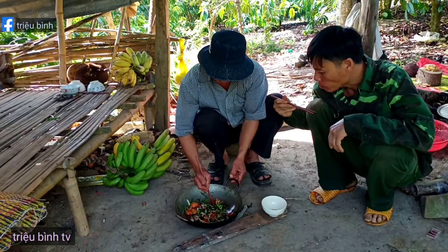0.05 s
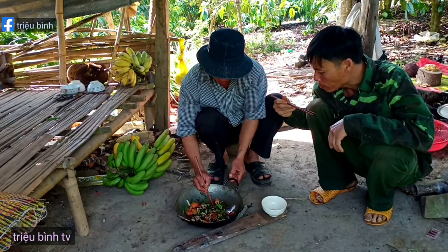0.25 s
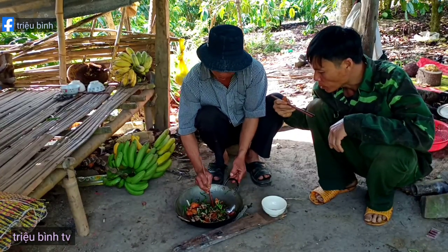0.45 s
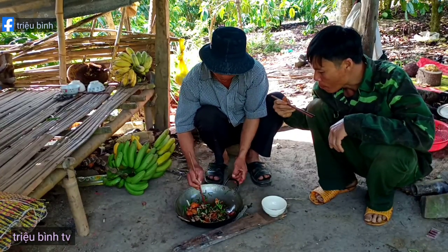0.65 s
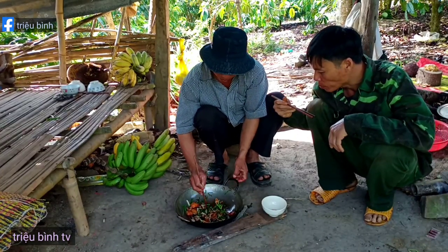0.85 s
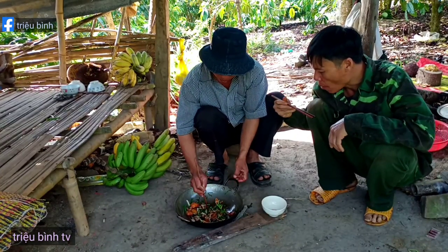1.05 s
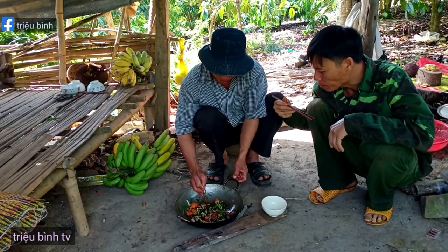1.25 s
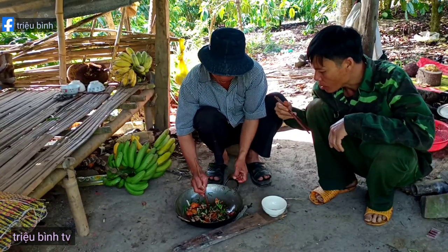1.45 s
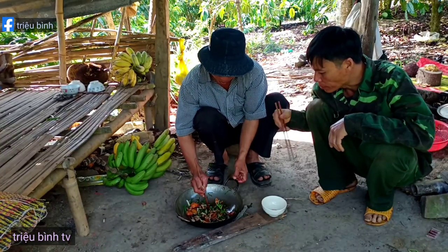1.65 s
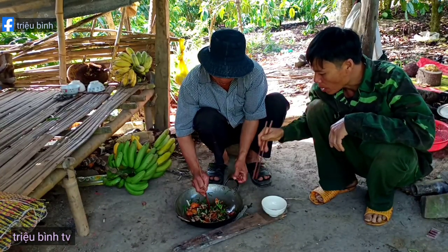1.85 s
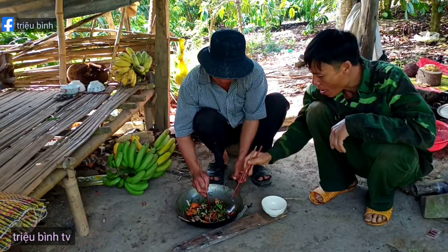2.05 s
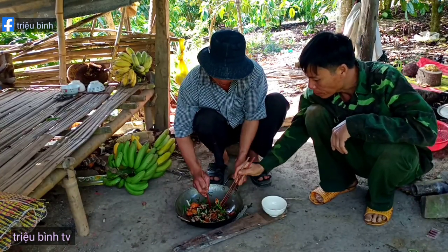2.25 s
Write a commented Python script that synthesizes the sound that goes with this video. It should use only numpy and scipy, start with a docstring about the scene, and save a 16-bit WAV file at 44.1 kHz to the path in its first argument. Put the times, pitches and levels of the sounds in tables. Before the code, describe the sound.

Hard shells rattle and clack in a metal wok, then sparse ticks and soft hollow knocks

```python
"""A quick rattle of shells builds to sharp clacks, then sparse ticks and hollow knocks follow over hum and air.
Chopsticks stir hard shells in a metal wok: each contact excites resonances of shell, heap, treble and wok body.
Noise grains make the sliding scrape; short decaying sines make the hollow knocks.
Air, engine hum and crackle are loud during the rattle, then drop and swell briefly around small sounds.
A camera microphone adds faint hiss, dips the low treble and cuts the top."""
import sys
import numpy as np
from scipy import signal
from scipy.fft import rfft, irfft
from scipy.io import wavfile
from scipy.ndimage import uniform_filter1d

SR = 44100
rng = np.random.default_rng(int(sys.argv[2]) if len(sys.argv) > 2 else 0)


def transcribe(u):
    """Save the signal u as a 16-bit wav file named by the first command-line argument.

    u: samples, shape (n,) or (channels, n), limited to [-1, 1]; the rate is SR.
    q: integer samples, one column per channel.
    """
    v = np.clip(np.atleast_2d(u).T, -1, 1)
    q = np.round(v * 32767).astype(np.int16)
    wavfile.write(sys.argv[1], SR, q)


N = 101429


def amp(db):
    """Decibels to linear gain."""
    return 10 ** (np.asarray(db) / 20)


def band(x, hz, width_hz):
    """Two-pole resonance, gain 1 at the centre."""
    return signal.lfilter(*signal.iirpeak(hz, hz / width_hz, fs=SR), x)


def bandpass(x, low_hz, high_hz, order=3):
    """Flat-topped band between two edges."""
    return signal.sosfilt(signal.butter(order, [low_hz, high_hz], "band", fs=SR, output="sos"), x)


def highpass(x, hz):
    """Second-order removal of everything low."""
    return signal.sosfilt(signal.butter(2, hz, "high", fs=SR, output="sos"), x)


def add(out, at_s, x):
    """Mix x in from time at_s."""
    i = int(at_s * SR)
    out[i:i + len(x)] += x[:len(out) - i]


def fade(t, t60):
    """Exponential decay, 60 dB down after t60 seconds."""
    return np.exp(-np.log(1000) * t / t60)


def peak(x, db):
    """Scale x so its highest peak sits at db."""
    return x * amp(db) / np.max(np.abs(x))


def walk(rate):
    """Slow random drift of spread 1: noise averaged twice over 1/rate seconds."""
    window = int(SR / rate)
    x = uniform_filter1d(uniform_filter1d(rng.standard_normal(N), window), window)
    return x / np.std(x)


def hum():
    """Three harmonics of a distant engine, unsteady in pitch and each in level."""
    # Each row: rms level in dB of one harmonic, lowest first, before the background level is applied
    harmonic_db = [-73, -74, -77]
    hum_hz, waver, flutter_db = 43.8, 0.052, 1.5  # waver is the pitch spread as a share
    phase = 2 * np.pi * np.cumsum(hum_hz * (1 + waver * walk(8))) / SR
    out = np.zeros(N)
    for k, db in enumerate(harmonic_db):
        level = np.sqrt(2) * amp(db + flutter_db * walk(2.1))
        out += level * np.sin((k + 1) * phase + 2 * np.pi * rng.random())
    return out


def crackle():
    """Tiny scattered treble ticks, each with a short noise tail."""
    per_s, gain_db, spread_db, centre_hz = 99, -76, 3, 8300
    ticks_at = rng.random(N) < per_s / SR
    impulses = ticks_at * amp(spread_db * rng.exponential(size=N))
    t = np.arange(SR // 20) / SR
    tail = rng.standard_normal(len(t)) * fade(t, 0.1)
    x = signal.fftconvolve(impulses, tail)[:N]
    return amp(gain_db) * band(band(x, centre_hz, 1500), centre_hz, 2300)


def air():
    """Outdoor air: noise shaped in frequency, split at 4500 Hz into a low and a high part."""
    # Spectrum of the air. Each row: frequency in Hz, relative level in dB per Hz
    spectrum = np.array([(20, -31.5), (40, -11), (110, -3.5), (190, -10), (250, -8), (476, -9.5),
                         (1330, -14), (3600, -19.5), (4300, -24), (5000, -27), (7000, -29.5), (8500, -26),
                         (9800, -31), (15500, -39)])
    air_rms_db = -66.5  # before the background level is applied
    f = np.maximum(np.fft.rfftfreq(N, 1 / SR), 1)
    shape_db = np.interp(np.log(f), np.log(spectrum[:, 0]), spectrum[:, 1])
    noise = rfft(rng.standard_normal(N)) * amp(shape_db)
    noise *= amp(air_rms_db) / np.std(irfft(noise, N))
    return irfft(noise * (f < 4500), N), irfft(noise * (f >= 4500), N)


def background():
    """Air, hum and crackle rise and fall together; in the brief swells the treble has its own height."""
    # Level curve laid over the bed. Each row: time in seconds, gain in dB
    level_curve = [(0, 11), (.03, 23), (.08, 19.5), (.2, 26.5), (.24, 25.5), (.28, 22.5), (.343, 27),
                   (.355, 20), (.45, 10.5), (.66, 10.5), (.685, -4), (.85, -2.5), (1.4, -0.5), (2.3, 2)]
    # Brief swells. Each row: start of hold in seconds, held time in seconds, height in dB, treble height in dB
    swells = [(0.865, 0.048, 15, 15.5), (1.058, 0.049, 8, 13.5), (1.317, 0.053, 15.5, 16),
              (1.498, 0.061, 10, 15), (1.636, 0.011, 6, 2.5), (1.782, 0.04, 14, 13.5),
              (2.277, 0.031, 9, 6.5)]
    rise_s, fall_s, sag = 0.014, 0.02, 0.11  # sag: share of a swell lost while it is held
    hum_share = 0.85  # share of the gain in dB that the hum follows
    t = np.arange(N) / SR
    low, high = air()
    high = high * amp(1.4 * walk(22)) + crackle()  # the air's treble flickers
    gain_db = np.interp(t, *np.array(level_curve).T)
    high_db = gain_db
    for at, held, db, treble_db in swells:
        corners = [at - rise_s, at, at + held, at + held + fall_s]
        shape = np.interp(t, corners, [0, 1, 1 - sag, 0])
        gain_db = gain_db + db * shape
        high_db = high_db + treble_db * shape
    return low * amp(gain_db) + hum() * amp(hum_share * gain_db) + high * amp(high_db)


def scrape():
    """Shells sliding on the steel: dense fine grains in the low treble, with a thin hiss on top."""
    from_s, to_s, per_s, gain_db, hiss_db = 0.015, 0.3, 2500, -33, -10.5  # hiss gain re low treble
    t = np.arange(N) / SR
    grains = (rng.random(N) < per_s / SR) * rng.standard_normal(N)
    grains = grains * amp(2.5 * walk(90))  # uneven pressure
    grains *= np.interp(t, [from_s, from_s + .01, to_s, to_s + .06], [0, 1, 1, 0])
    mid = bandpass(grains, 2000, 4300)
    top = bandpass(grains, 7500, 15000, order=1)
    return amp(gain_db) * (mid + amp(hiss_db) * top)


def knocks():
    """A few cycles of a hollow low note and its upper mode, with a scuff of noise behind."""
    # Hollow knocks. Each row: start in seconds, note peak in dB, pitch in Hz, decay t60 in seconds,
    # scuff in dB re note, upper mode in dB re the pitch
    knock_table = [(.159, -40, 403, 0.022, -22, -9), (.234, -25, 408, 0.04, -30.5, -9),
                   (0.865, -38, 375, 0.09, -7, -2.5), (1.317, -45.5, 429, 0.086, -17, -17),
                   (1.326, -42, 358.5, 0.081, 3.5, -10), (1.534, -42.5, 95, 0.074, -30, -7),
                   (1.7816, -37, 401.5, 0.039, -3.5, -6), (2.283, -29, 428, 0.03, -13.5, -19)]
    upper_ratio, rise_s = 1.5, 0.0016
    scuff_t60_s, scuff_cut_s, scuff_release_s = 0.3, 0.041, 0.02
    out, t = np.zeros(N), np.arange(SR // 6) / SR
    for at, db, hz, t60, scuff_db, upper_db in knock_table:
        note = np.sin(2 * np.pi * hz * t) + amp(upper_db) * np.sin(2 * np.pi * upper_ratio * hz * t)
        note *= (1 - np.exp(-t / rise_s)) ** 2 * fade(t, t60)
        scuff = bandpass(rng.standard_normal(len(t)) ** 3, 700, 3800)  # cubing makes it spiky
        scuff *= fade(t, scuff_t60_s)
        scuff *= np.interp(t, [scuff_cut_s, scuff_cut_s + scuff_release_s], [1, 0])
        add(out, at, peak(note, db) + peak(scuff, db + scuff_db))
    return out


def contact(t, t60, tail_rms):
    """Raw excitation: a unit tick, four quick bounces that weaken with delay, and a fading noise tail."""
    bounce_s, bounce_db = 0.004, -3.5  # span of the bounces, level change across it
    noise, when = rng.standard_normal(len(t)), rng.random(4)
    hit = tail_rms * noise * fade(t, t60)
    hit[0] += 1
    bounce_at = (when * bounce_s * SR).astype(int) + 8
    hit[bounce_at] += amp(bounce_db * when) * np.sign(noise[:4])
    return hit


def ring(hit, hz, q):
    """Shell ring: two resonances in series, the second half as sharp, peak at 0 dB; Q is at least 0.7."""
    width_hz = hz / max(q, .7)
    return peak(band(band(hit, hz, width_hz), hz, 2 * width_hz), 0)


def treble(hit, db, hz):
    """A bright 2000 Hz wide band, a flat fizz above it and a weak broad layer."""
    bright = bandpass(hit, hz - 1000, hz + 1000)
    fizz = highpass(hit, 10200) * fade(np.arange(len(hit)) / SR, 0.57)
    wide = band(hit, 6000, 7000)
    return peak(bright, db) + peak(fizz, db - 3) + peak(wide, db - 20)


def modes(table, t):
    """Sum of decaying sines, one for each way the body vibrates."""
    return sum(amp(db) * np.sin(2 * np.pi * hz * t) * fade(t, t60) for hz, db, t60 in table)


def ticks():
    """Light contacts: softer start, more tail, no wok body."""
    # Faint ticks and clinks. Each row: start in seconds, peak in dB, ring in Hz, bright band in dB re ring,
    # ring sharpness Q, tail t60 in seconds
    tick_table = [(0.4892, -41.5, 2180, -2, 0.98, 0.068), (0.539, -46, 2570, -15, 6, 0.1),
                  (0.5548, -39.5, 2500, -12, 2.9, 0.047), (.604, -49.5, 3040, 2, 1.5, 0.06),
                  (.611, -39, 3200, 2, 0.65, 0.065), (0.6399, -46, 1400, -6, 1.3, 0.067),
                  (1.056, -51, 2360, 7, 2.35, .1), (1.069, -41, 3520, -6.5, 1.83, 0.11),
                  (1.239, -56.5, 3230, -12.5, 8.8, 0.07), (1.4534, -57, 2982, 3, 2.3, 0.066),
                  (1.467, -50.5, 3020, 8.5, 0.63, 0.12), (1.493, -50, 3776, 12.5, 3.1, .1),
                  (1.5104, -29.5, 3150, 9.5, 1.05, 0.066), (1.5168, -38, 2610, -1, 0.5, 0.096),
                  (1.6392, -52, 2484, 4, 3.07, 0.086), (1.683, -59, 3070, 13, 1.57, 0.065),
                  (2, -49, 2450, -32.5, 2.7, 0.063), (2.0483, -55.5, 3260, -8, 7.5, 0.069),
                  (2.282, -40.5, 3710, 6, 1.4, 0.069)]
    treble_hz, rise_s = 8036, 0.00046
    out, t = np.zeros(N), np.arange(SR // 8) / SR
    for at, db, hz, treble_db, q, t60 in tick_table:
        hit = contact(t, t60, 0.42 * amp(-2))
        hit *= 1.5 - np.exp(-t / rise_s)  # gain climbs from 0.5 to 1.5
        add(out, at, peak(ring(hit, hz, q) + treble(hit, treble_db, treble_hz), db))
    return out


def clacks():
    """Each contact rings the struck shell, the heap, the treble and the wok body."""
    # Shell and chopstick clacks. Each row: start in seconds, peak in dB, shell ring in Hz,
    # bright band in dB re ring, its centre in Hz, wok body in dB re ring, tail t60 in seconds
    clack_table = [(0.0216, -26, 2530, -1, 8300, -24, 0.1), (0.0473, -22, 2700, 1, 8600, -15, 0.074),
                   (0.0809, -28.5, 2780, -3, 8800, -18, 0.12), (.1129, -29, 2546, -6, 8000, -21.5, .15),
                   (.1352, -21, 2722, -12, 8360, -6.5, .08), (.144, -19.5, 3100, -3.5, 8360, -12, .12),
                   (0.1709, -24.5, 2668, -6, 8250, -31, 0.11), (0.192, -23.5, 2680, 0, 8800, -33.5, .12),
                   (0.2008, -23.5, 2495, -3, 8200, -11, .1), (.2054, -16, 2485, -7, 8100, -9.5, .08),
                   (0.2146, -9.5, 3540, 4, 7900, -19, .12), (.2178, -10.5, 3718, -1, 7750, -19.5, .13),
                   (0.2936, -13, 2660, 8.5, 8500, -10.5, 0.14), (.3126, -3.5, 2205, 7.5, 8680, -12.5, .06),
                   (.3162, -10.5, 2050, -3.5, 7940, -6.5, .03), (.3198, -7.5, 2307, -0.5, 7500, -15.5, .06),
                   (.3232, -9, 2024, -4.5, 7800, -10, 0.053), (0.3401, -9, 3120, 9.5, 8900, -18.5, 0.042),
                   (0.344, -1, 3300, -5, 7900, -42.5, .07), (0.3469, -4, 1704, 1.5, 7160, -8, .098),
                   (0.355, -11, 3816, -4.5, 7350, -26.5, .18)]
    # Modes of the wok body. Each row: frequency in Hz, relative level in dB, t60 in seconds
    wok_table = [(698, 1.5, 0.05), (751, 9, 0.045), (882.7, -2.5, .05), (1247, -5.5, 0.04),
                 (1665, -8.5, 0.062)]
    # Modes shared by the heap of shells. Each row: frequency in Hz, relative level in dB, t60 in seconds
    shell_table = [(2067, -4.5, 0.066), (3220, -2.5, 0.085), (3704, 0, 0.056), (3914, 1, 0.049)]
    ring_q, broad_db, heap_db = 2.7, -9, -8.5  # both levels re ring
    out, t = np.zeros(N), np.arange(SR // 5) / SR
    wok_modes, heap_modes = modes(wok_table, t), modes(shell_table, t)
    for at, db, hz, treble_db, treble_hz, body_db, t60 in clack_table:
        hit = contact(t, t60, 0.42 * amp(-11.5))
        broad = bandpass(hit, .7 * hz, min(1.5 * hz, 4300))
        wok = peak(signal.fftconvolve(hit, wok_modes)[:len(t)], body_db)
        heap = peak(signal.fftconvolve(broad, heap_modes)[:len(t)], heap_db)
        shell = ring(hit, hz, ring_q) + peak(broad, broad_db)
        add(out, at, peak(shell + treble(hit, treble_db, treble_hz) + wok + heap, db))
    return out


def scene():
    """The bed, the sliding shells and all contacts in one channel."""
    return (background() + scrape() + knocks() + ticks() + clacks())[None]


def record(dry):
    """The camera microphone hisses faintly, dips the low treble, rolls off the last treble and cuts the top."""
    dip_hz, dip_width_hz, dip_share = 4810, 880, 0.33
    hiss = amp(-85) * highpass(rng.standard_normal(dry.shape), 10000)
    dipped = dry - dip_share * band(dry, dip_hz, dip_width_hz)
    soft = signal.sosfilt(signal.ellip(5, .3, 22, 15550, fs=SR, output="sos"), dipped + hiss)
    return signal.sosfilt(signal.ellip(10, .2, 70, 16250, fs=SR, output="sos"), soft)


dry = scene()
out = record(dry)
transcribe(out)
```